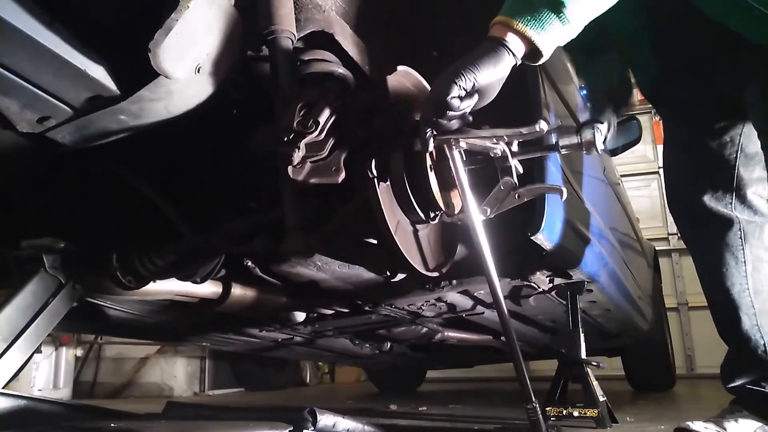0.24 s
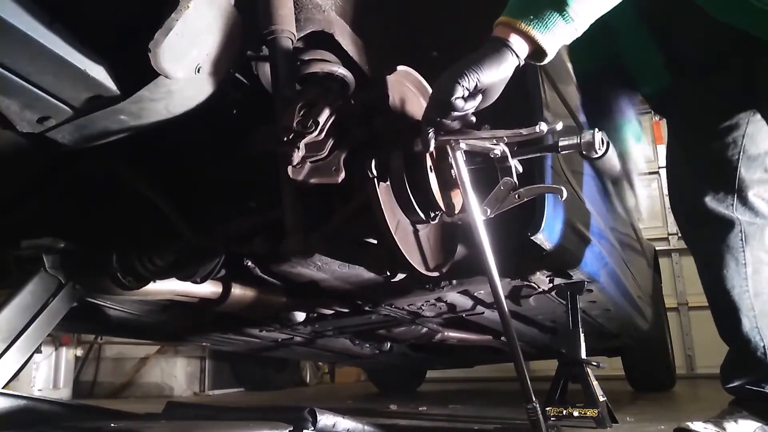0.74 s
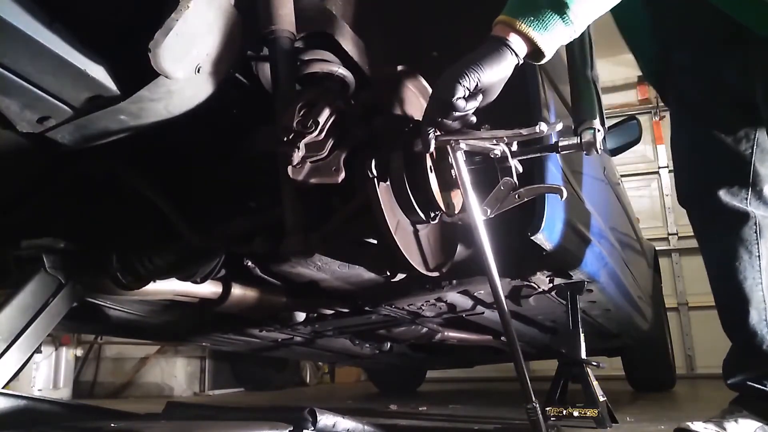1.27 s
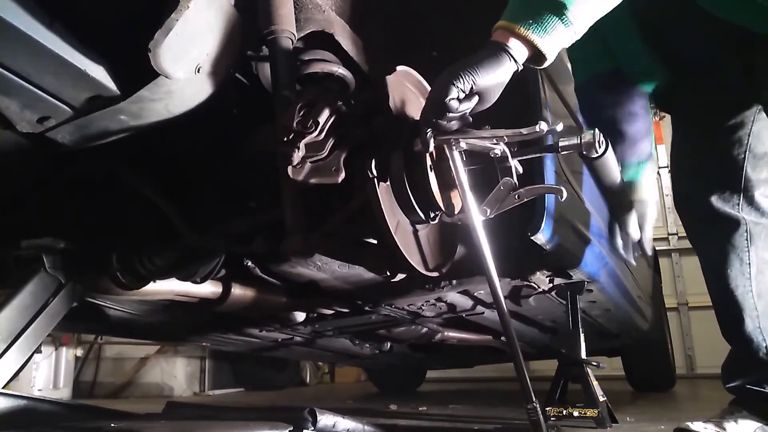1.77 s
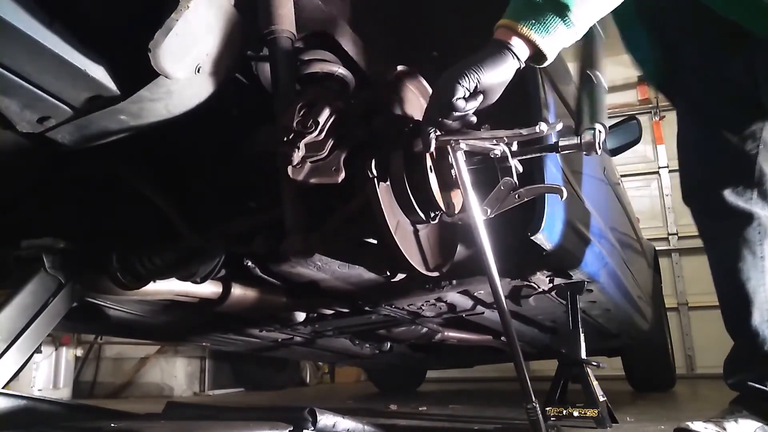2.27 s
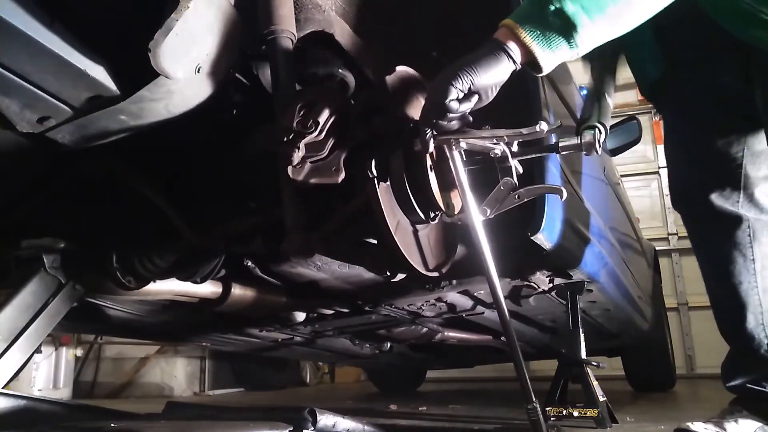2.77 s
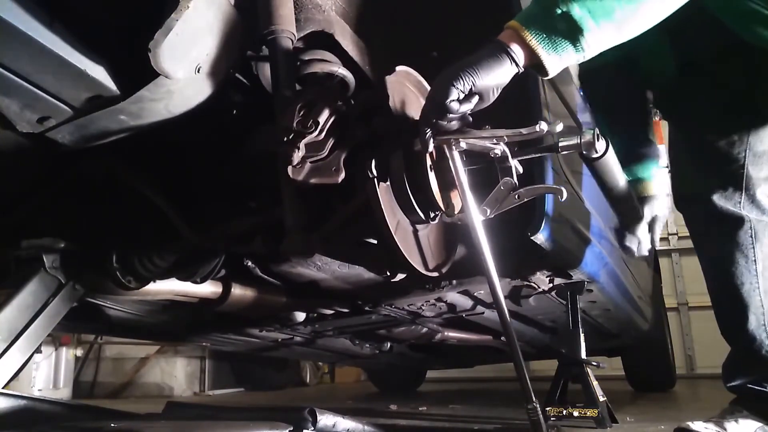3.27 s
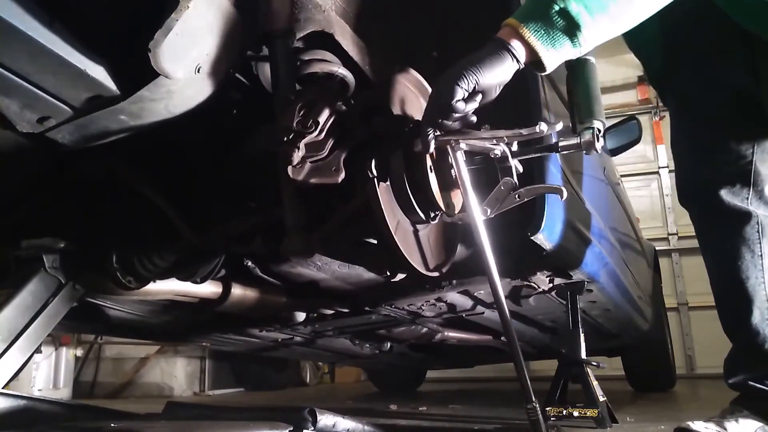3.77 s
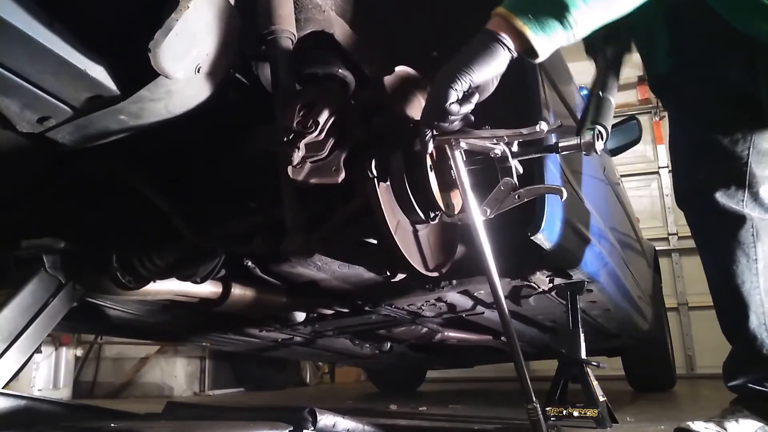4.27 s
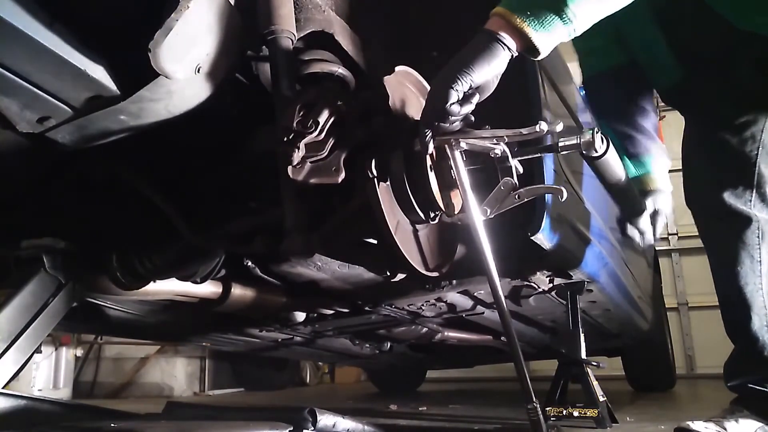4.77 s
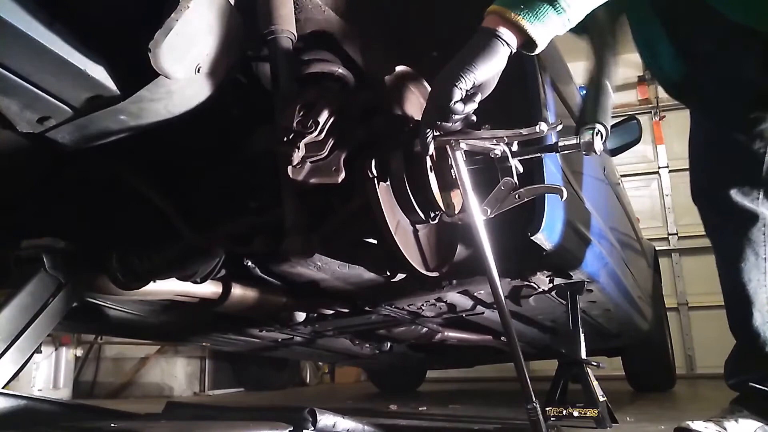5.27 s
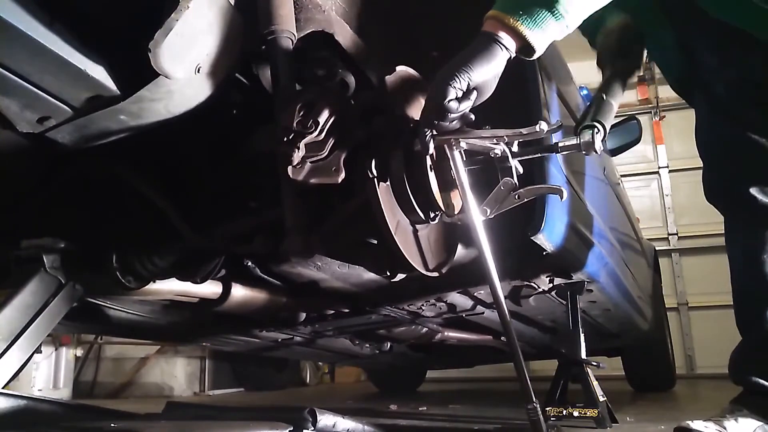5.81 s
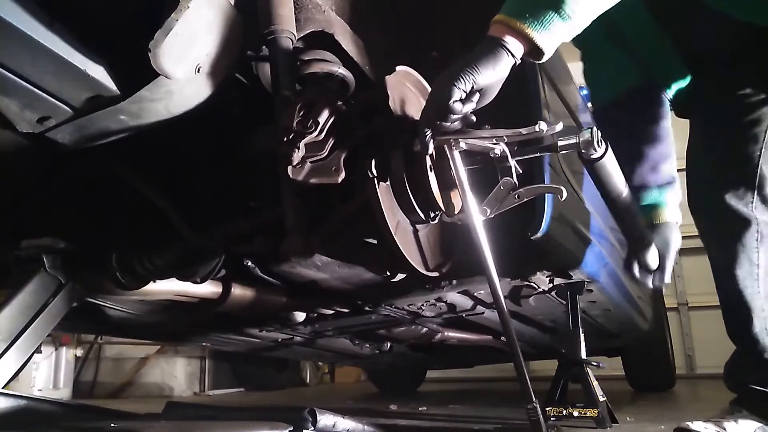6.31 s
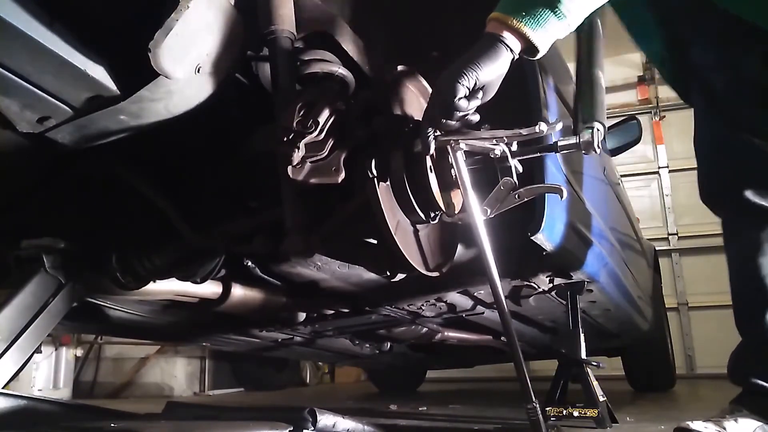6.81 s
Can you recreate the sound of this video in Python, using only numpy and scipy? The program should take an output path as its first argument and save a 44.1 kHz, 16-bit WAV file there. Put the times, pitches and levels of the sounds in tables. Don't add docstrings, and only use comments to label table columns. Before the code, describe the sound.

A steel puller works on a car hub: a hard bang, then clanking, knocking and ticking cycles, then a second equally hard bang.

```python
import sys
import numpy as np
from scipy import signal
from scipy.fft import rfft, irfft, next_fast_len
from scipy.io import wavfile
from scipy.ndimage import uniform_filter1d

SR = 44100
rng = np.random.default_rng(int(sys.argv[2]) if len(sys.argv) > 2 else 0)


def materialize(psi):
    bounded = np.clip(np.atleast_2d(psi).T, -1, 1)
    quanta = np.round(bounded * 32767).astype(np.int16)
    wavfile.write(sys.argv[1], SR, quanta)


def level_to_linear(level):
    exponent = np.asarray(level, float) / 20
    return 10 ** exponent


N = 310905

SPAN = 16384
HZ = np.fft.rfftfreq(SPAN, 1 / SR) + 1

# (frequency [Hz], width [Hz], level [dB])
CAR_MODES = [(127.5, 5.3, -3), (155.3, 13, -1.5), (191, 9, -10.5), (219, 9, -6.5), (252.5, 18, -2.5),
             (340, 9, -2), (388, 12, -3), (417, 8.6, -3), (1516, 27, -3), (1557, 22, -2.5), (3800, 80, -9),
             (4530, 53, -3), (4714, 60, 1.5), (5750, 80, -4)]
# (frequency [Hz], width [Hz], level [dB])
SLACK_MODES = [(1470, 84, -20), (2053, 34, -8.5), (2540, 46, -11.5), (2880, 30, -14), (3680, 21, -8),
               (3742, 82, 1.5), (5000, 43, -15.5), (5640, 47, -8.5), (5800, 54, -6.5), (6400, 49, -9.5),
               (7100, 77, -17), (9050, 23, -16.5), (10600, 44, -18.5), (12600, 40, -22)]
# (frequency [Hz], width [Hz], level [dB])
LOAD_MODES = [(1158, 33, -3), (1480, 55, -3), (2060, 64, -6), (2980, 73, -7), (4430, 70, -6),
              (4850, 47, -3), (5330, 28, 1), (5430, 25, -3.5), (5800, 45, -5.5), (7500, 64, -14),
              (8170, 58, -7), (9650, 27, -11), (11400, 17, -13.5), (13510, 18, -14)]
# (frequency [Hz], width [Hz], level [dB])
LAST_LOAD_MODES = [(1460, 78, -12), (2130, 68, -6), (2610, 32, -15), (3780, 50, -14), (4400, 27, -1.5),
                   (4700, 35, -4.5), (5120, 45, 1.5), (5850, 34, 5.5), (6330, 100, -2), (8100, 36, -5.5),
                   (9750, 40, -9.5), (11400, 60, -21.5), (13350, 30, -18.5), (15200, 40, -25.5)]
# (frequency [Hz], level [dB])
SLACK_TONE = [(180, -41), (300, -21), (1730, -15.5), (2050, -8.5), (3220, -16), (3620, -13.5), (4200, -11),
              (5680, 1.5), (10800, -20.5), (13500, -31), (16300, -75.5)]
# (frequency [Hz], level [dB])
LOAD_TONE = [(180, -30), (300, -15), (800, -17.5), (1490, -10), (3400, -15), (5400, -7), (7000, -13.5),
             (9000, -28.5), (13500, -44.5), (16300, -54.5)]
# (frequency [Hz], t60 [s], left-right likeness [0-1], build-up [ms], echo level [dB])
GARAGE = [(30.4, 0.93, 0.4, 27, -3.5), (149, 0.61, 1, 13, 6), (283, 0.54, 1, 22, 2), (640, 0.57, 0, 2.9, 5),
          (1481, 0.51, 0.04, 3.5, 3.5), (4040, 0.49, 0.08, 0.8, 1), (8700, 0.28, 0.3, 0.65, -5),
          (15100, 0.094, 0.2, 3, -9)]


def at_hz(points, hz, axis=1):
    points = np.array(points)
    return np.interp(np.log(hz), np.log(points[:, 0]), points[:, axis])


def causal(level_db):
    cepstrum = irfft(level_db * np.log(10) / 20, SPAN)
    cepstrum[1:SPAN // 2] *= 2
    cepstrum[SPAN // 2 + 1:] = 0
    return np.exp(rfft(cepstrum))


def resonances(modes):
    hz, width, _ = np.transpose(modes)[:, :, None]
    width = np.clip(width, 4, 900)
    return 1j * width * HZ / (hz ** 2 - HZ ** 2 + 1j * width * HZ)


def add(track, s, sound):
    i = round(s * SR)
    track[:, i:i + SPAN] += sound[:, :N - i]


def contacts(rows, touch, tone, modes, ring_db, level_db, treble_db, tilt=0.17, pivot_hz=4000,
             swell=0.77, uneven_db=3.0, lag=3):
    out = np.zeros((2, N))
    t = np.arange(SPAN) / SR
    fade = np.minimum(1, 8 * (1 - np.arange(SPAN) / SPAN))
    shapes = resonances(modes)
    mode_db = np.array(modes)[:, 2]
    mode_energy = np.sum(abs(shapes) ** 2, axis=1)
    pan_db, length_ms, share = touch
    u = 1000 * t / max(length_ms, .3)
    touch_shape = u ** np.clip(swell, .3, 4) * np.exp(-2 * u)
    octaves = np.log2(np.clip(HZ / pivot_hz, .25, 4))
    crack_power = level_to_linear(at_hz(tone, HZ)) ** 2
    for s, peak_db, own_treble_db in rows:
        chatter = rfft(rng.standard_normal(SPAN) * touch_shape)
        power = abs(chatter) ** 2
        grip = np.sqrt(abs(shapes) ** 2 @ power / mode_energy / power.mean())
        uneven = uneven_db * rng.standard_normal(len(modes))
        strength = share * level_to_linear(mode_db + ring_db + uneven) / grip
        ring_power = strength ** 2 @ abs(shapes) ** 2
        body_db = 10 * np.log10(crack_power + ring_power)
        hardness_db = tilt * (own_treble_db - treble_db) * octaves
        sound = irfft(chatter * causal(hardness_db + body_db), SPAN) * fade
        peak = np.sqrt(uniform_filter1d(sound ** 2, size=176).max())
        sound *= level_to_linear(peak_db + level_db) / peak
        ports = np.stack([sound, np.roll(sound, lag)])
        add(out, s, ports * level_to_linear(np.array([[pan_db / 2], [-pan_db / 2]])))
    return out


def part_lets_go():
    # (time [s], peak level [dB], treble against peak [dB])
    releases = [
        (.338, 3, -11),
        (6.086, 3, -10),
    ]
    # (frequency [Hz], level [dB])
    bang_tone = [(24, -54), (40, -18), (96, -28.5), (140, -13.5), (404, -9), (720, -17), (1530, -14.5),
                 (2660, -16), (4700, -9), (6000, -9), (7600, -14), (14500, -17.5), (15600, -45)]
    grind_lag_s, grind_db = .003, -11.5
    grinds = [(s + grind_lag_s, db + grind_db, treble_db) for s, db, treble_db in releases]
    crack = contacts(releases, (-1.4, 6, 0.14), bang_tone, CAR_MODES,
                     ring_db=1.5, level_db=-0.5, treble_db=-5.5, tilt=0.51, swell=0.23)
    grind = contacts(grinds, (5.1, 59.2, 0.92), bang_tone, CAR_MODES,
                     ring_db=-1.0, level_db=-3, treble_db=-10, tilt=0.41)
    return crack + grind


def handle_takes_load():
    # (time [s], peak level [dB], treble against peak [dB])
    full = [
        (1.4317, -12.5, -1.5),
        (1.4528, -26, -36),
        (4.0933, -6, 3),
        (4.1129, -22.5, -30),
    ]
    light = [
        (2.6476, -13, -9.5),
        (2.827, -25.5, -12.5),
    ]
    last = [
        (5.699, -7.5, -7.5),
    ]
    # (frequency [Hz], width [Hz], level [dB])
    light_modes = [(1190, 30, -4.5), (1743, 40, -5), (2040, 36, -1.5), (3930, 45, -1), (4420, 60, -3.5),
                   (5700, 46, 1), (6200, 40, -4), (8100, 40, 0), (9800, 37, -12), (11000, 25, -21),
                   (11600, 30, -16), (13320, 18, -13)]
    touch = (2.4, 5.36, 0.52)
    clank = contacts(full, touch, LOAD_TONE, LOAD_MODES,
                     ring_db=5.0, level_db=-4.5, treble_db=-10.5, tilt=0.28, swell=1.44)
    light_clank = contacts(light, touch, LOAD_TONE, light_modes,
                           ring_db=1, level_db=-4.0, treble_db=-17, tilt=0.18, swell=1.45)
    bite = contacts(last, (2, 3.6, 0.49), LOAD_TONE, LAST_LOAD_MODES,
                    ring_db=5.5, level_db=-3.5, treble_db=-11.5, tilt=0.22, swell=1.7)
    return clank + light_clank + bite


def handle_drops_slack():
    # (time [s], peak level [dB], treble against peak [dB])
    knocks = [
        (1.9555, -6, -19.5),
        (3.3555, -6, -21),
        (4.9035, -6, -19.5),
    ]
    taps = [
        (1.9275, -12.5, -1),
        (1.9954, -16.5, -14.5),
        (3.3273, -18, -5.5),
        (4.9399, -14, -20.5),
    ]
    knock = contacts(knocks, (0.99, 4.6, 0.99), SLACK_TONE, SLACK_MODES,
                     ring_db=8, level_db=0.0, treble_db=-18, tilt=0.36, swell=2.63)
    tap = contacts(taps, (5.3, 3.1, 0.38), SLACK_TONE, SLACK_MODES,
                   ring_db=-4.0, level_db=-4.5, treble_db=-27.0)
    return knock + tap


def handle_recoils():
    # (time [s], peak level [dB], treble against peak [dB])
    rebounds = [
        (.7188, -19.5, 2),
        (.741, -20.5, 8),
        (6.49, -24, -1),
    ]
    snaps = [
        (6.4625, -7, -8),
    ]
    # (frequency [Hz], level [dB])
    recoil_tone = [(880, -53), (1500, -17), (1720, -34), (2210, -7), (3470, -24), (5710, 8.5),
                   (12700, -21.5), (14400, -38), (16300, -105)]
    rebound = contacts(rebounds, (17, 14, 0.17), recoil_tone, SLACK_MODES,
                       ring_db=9.0, level_db=-5.5, treble_db=-22)
    snap = contacts(snaps, (2.7, 4, 0.5), recoil_tone, SLACK_MODES,
                    ring_db=5.5, level_db=-3.0, treble_db=-15.5, swell=2.1)
    return rebound + snap


def handle_drags():
    # (time [s], peak level [dB], treble against peak [dB])
    drags = [
        (5.612, -30, -39.5),
        (5.648, -30, -32.5),
        (5.672, -26.5, -39.5),
        (.664, -21.5, -29),
        (6.412, -21, -17),
        (2.62, -25.5, -28.5),
    ]
    return contacts(drags, (1.4, 32, .4), SLACK_TONE, LAST_LOAD_MODES[:10],
                    ring_db=11.5, level_db=-3.0, treble_db=-24, swell=0.78)


def pawl_ticks():
    # (time [s], peak level [dB], treble against peak [dB])
    ticks = [(.8383, -35, -11), (.8885, -38.5, -16), (.9404, -37, -16), (.9939, -33, -12.5),
             (1.0466, -27.5, -6), (1.1165, -25, -1), (2.1065, -16, -15.5), (2.155, -13.5, -12.5),
             (2.2093, -17, -13.5), (2.2541, -14.5, -4.5), (2.3105, -18.5, -10), (2.389, -16, -5.5),
             (3.5044, -15, -14), (3.552, -15, -14.5), (3.5997, -16.5, -13.5), (3.6415, -17, -17),
             (3.682, -17.5, -14.5), (3.7404, -18, -14), (5.135, -17.5, -15.5), (5.2003, -15.5, -15.5),
             (5.2627, -16, -12.5), (5.3269, -16, -5), (5.3908, -15, -7.5)]
    free_ticks = [
        (6.5847, -29, 0),
        (6.6408, -33, -5.5),
        (6.6872, -33.5, -9),
        (6.7396, -31.5, 5),
        (6.7999, -35.5, -9),
        (6.8478, -43.5, -10),
        (6.9089, -41, -8),
    ]
    # (frequency [Hz], level [dB])
    pawl_tone = [(800, -33), (2000, -14.5), (4000, -13.5), (6500, -1.5), (8300, -14.5), (9600, -29),
                 (11300, -20), (13000, -26.5), (15300, -22.5), (16400, -26)]
    # (frequency [Hz], width [Hz], level [dB])
    pawl_modes = [(2160, 150, -16.5), (3820, 140, -15), (5730, 200, -13.5), (7260, 150, -11.5),
                  (9510, 154, 3.5), (9550, 59, -6), (10000, 85, -7), (11060, 81, -22), (11260, 100, -6),
                  (14700, 90, 0), (15420, 70, -2.5), (15700, 70, -4.5)]
    free_modes = [(3860, 170, -18), (6300, 190, -21), (9460, 170, -8), (11070, 200, -8.5),
                  (12940, 310, -10), (14500, 81, -7), (15060, 89, 12), (15500, 90, -4)]
    touch = (13.36, 4.56, 0.85)
    tick = contacts(ticks, touch, pawl_tone, pawl_modes, ring_db=6, level_db=-8.0, treble_db=-10.0,
                    tilt=0.62, pivot_hz=9600, swell=0.55, uneven_db=4.5, lag=2)
    free_tick = contacts(free_ticks, touch, pawl_tone, free_modes, ring_db=6.5, level_db=-2.0, treble_db=-7,
                         tilt=0.46, pivot_hz=9700, uneven_db=9.0, lag=2)
    return tick + free_tick


def puller_shifts():
    # (time [s], peak level [dB], treble against peak [dB])
    shifts = [
        (.0425, -53, -1),
        (1.5785, -30.5, -11),
        (1.8354, -66, -5),
        (3.2384, -54.5, -24),
        (3.9742, -50, -25),
        (4.4887, -35.5, -13),
        (4.8644, -46.5, -14),
    ]
    return contacts(shifts, (-7.5, 29, 0.32), LOAD_TONE, LOAD_MODES[:9],
                    ring_db=1, level_db=-5, treble_db=-18, tilt=.25)


def car_thuds():
    # (time [s], peak level [dB], treble against peak [dB])
    thuds = [(1.583, -29, -11.5), (1.956, -24, -16.5), (2.699, -38.5, -4), (2.829, -25.5, 12),
             (2.873, -41.5, -27), (3.228, -42.5, -19.5), (3.368, -22, -10), (4.111, -34, -6),
             (4.492, -25.5, 1.5), (4.533, -47.5, -31.5), (4.921, -25.5, -42), (5.616, -39.5, -31.5),
             (5.711, -26, -14.5)]
    # (frequency [Hz], level [dB])
    thud_tone = [(24, -30), (40, -23.5), (140, 2), (209, 2.5), (357, 1), (570, -11.5), (700, -21.5),
                 (900, -34.5), (1170, -52.5), (1980, -120)]
    return contacts(thuds, (-2.2, 45, 1), thud_tone, CAR_MODES[:8],
                    ring_db=0.0, level_db=-4.5, treble_db=-4.5, tilt=0.2, pivot_hz=248)


def bumps(rows, swell_ms, t60, level_db, pitch_spread):
    out = np.zeros((2, N))
    t = np.arange(SPAN) / SR
    swell = 1 - np.exp(-1000 * t / max(swell_ms, 1))
    decay = level_to_linear(-60 * t / max(t60, .02))
    shape = swell * decay * (1 - t / t[-1])
    for s, peak_db, hz in rows:
        detune, phase = rng.standard_normal((2, 3, 1))
        pitch = hz * (1 + pitch_spread * detune * [[0], [1], [1]])
        partials = np.array([[1], [.6], [.6]]) * np.sin(2 * np.pi * pitch * t + 2 * phase)
        sound = level_to_linear(peak_db + level_db) * partials.sum(axis=0) * shape / shape.max()
        add(out, s, np.tile(sound, (2, 1)))
    return out


def soft_bumps():
    # (time [s], peak level [dB], pitch [Hz])
    knocks = [(.075, -48.5, 453), (.127, -58, 423), (.227, -41.5, 314), (.297, -51, 300),
              (1.338, -41.5, 273), (1.449, -34, 257), (1.829, -65, 277), (2.396, -49.5, 516),
              (2.469, -46.5, 489), (2.59, -43, 168), (2.975, -53, 497), (3.105, -62, 1226),
              (1.19, -58, 880), (3.136, -55.5, 448), (3.777, -40.5, 266), (3.95, -49, 209),
              (4.743, -47.5, 450), (4.801, -42, 264), (5.211, -45, 417), (5.933, -47, 282),
              (6.861, -50, 488)]
    return bumps(knocks, swell_ms=10, t60=0.21, level_db=-8.5, pitch_spread=0.089)


def panel_hums():
    # (time [s], peak level [dB], pitch [Hz])
    hums = [
        (.7, -40.5, 385),
        (1.0, -54, 385),
        (6.45, -43.5, 391.7),
        (6.75, -56, 390),
    ]
    return bumps(hums, swell_ms=23, t60=1, level_db=-8.5, pitch_spread=0.0141)


def stereo_noise(count, level_db):
    hz = np.fft.rfftfreq(count, 1 / SR) + 1
    alike = np.clip(at_hz(GARAGE, hz, axis=2), 0, 1)
    mid, side = rfft(rng.standard_normal((2, count))) * level_to_linear(level_db(hz))
    mid = np.sqrt(1 + alike) * mid
    side = np.sqrt(1 - alike) * side
    return irfft([mid + side, mid - side], count)


def garage_echo():
    t = np.arange(SR) / SR
    out = 0
    for centre in 25 * 2 ** np.arange(0, 9.6, .5):
        band = stereo_noise(SR, lambda hz: -6 * (4 * np.log2(hz / centre)) ** 2 / 2)
        build_up = 1 - np.exp(-1000 * t / max(at_hz(GARAGE, centre, axis=3), .5))
        shape = build_up * level_to_linear(-60 * t / at_hz(GARAGE, centre))
        level = level_to_linear(at_hz(GARAGE, centre, axis=4))
        out = out + level * band * shape / np.sqrt(np.sum(shape ** 2))
    return out


def rms_one(x):
    return x / np.sqrt(np.mean(x ** 2) + 1e-20)


def flicker(rate, depth_db):
    steps = rng.standard_normal(400)
    return level_to_linear(depth_db * np.interp(np.arange(N) / SR * rate, np.arange(400), steps))


def sleeves_and_hush():
    # (time [s], level [dB])
    loudness = [(0, -58), (.1, -68), (1.35, -63.5), (1.78, -71.5), (1.9, -59.5), (2.6, -63), (3.1, -85),
                (3.2, -65), (3.9, -59), (4.4, -69), (5.95, -54), (6.08, -69), (6.95, -61), (7.05, -72.5)]
    # (frequency [Hz], level [dB])
    rustle_tone = [(59, -44.5), (100, -7.5), (270, 1), (353, -13.5), (452, -8.5), (791, -17), (4220, -18),
                   (4780, -16.5), (12400, -45.5), (14000, -58.5)]
    noise = stereo_noise(next_fast_len(N), lambda hz: at_hz(rustle_tone, hz))
    level_db = np.interp(np.arange(N) / SR, *np.transpose(loudness))
    return rms_one(noise)[:, :N] * flicker(22, depth_db=1.5) * level_to_linear(level_db)


def shaking():
    # (time [s], level [dB], held [s])
    jolts = [(.34, -35.5, .08), (1.409, -43, 0.19), (1.95, -37.5, 0.14), (2.6, -44.5, 0.25),
             (3.37, -32.5, 0.17), (4.09, -39.5, 0.043), (4.499, -45, 0.038), (4.9, -39.5, 0.21),
             (5.68, -33.5, 0.068), (6.09, -48, .1), (6.3, -42.5, 0.44)]
    rise_db_per_s, fall_db_per_s, still_db = 397.5, 133.5, -68.5
    t = np.arange(N) / SR
    s, db, held = np.transpose(jolts)[:, :, None]
    top = s + .04
    rise_db = rise_db_per_s * np.maximum(top - t, 0)
    fall_db = fall_db_per_s * np.maximum(t - top - held, 0)
    level_db = db - rise_db - fall_db
    return level_to_linear(np.maximum(level_db.max(axis=0), still_db) - 9.0)


def car_rumbles():
    # (frequency [Hz], level [dB])
    rumble_tone = [(12, -36.5), (20, -17.5), (48, -5.5), (64, 0), (86, -8.5), (110, -12), (140, -21.5),
                   (240, -120)]
    noise = stereo_noise(next_fast_len(N), lambda hz: at_hz(rumble_tone, hz) - 40 * (hz > 120))
    return rms_one(noise)[:, :N] * shaking()


def scene():
    bang = part_lets_go()
    load = handle_takes_load() + puller_shifts()
    slack = handle_drops_slack()
    recoil = handle_recoils() + handle_drags()
    pawl = pawl_ticks()
    thud = car_thuds()
    soft = soft_bumps() + panel_hums()
    sent = level_to_linear(5.5) * bang + level_to_linear(-7.0) * load + level_to_linear(-3.5) * slack + level_to_linear(-9.5) * recoil
    sent = sent + level_to_linear(-7.5) * pawl + level_to_linear(-17.0) * thud + level_to_linear(-5) * soft
    wet = signal.fftconvolve(sent[:1], garage_echo(), axes=1)[:, :N]
    wet = wet * level_to_linear(np.array([[-1.2], [1.2]]))
    direct = bang + load + slack + recoil + pawl + thud + soft
    return direct + wet + sleeves_and_hush() + car_rumbles()


def band_limit(x):
    return signal.sosfilt(signal.butter(12, 16420, fs=SR, output="sos"), x)


def record(dry):
    ceiling_db, release_db_per_s = -8, 59.5
    power = uniform_filter1d(np.mean(dry ** 2, axis=0), size=400)
    level_db = 10 * np.log10(power + 1e-12)
    ramp = release_db_per_s * np.arange(N) / SR
    over_db = np.maximum.accumulate(np.maximum(level_db - ceiling_db, 0) + ramp) - ramp
    limited = dry * level_to_linear(-uniform_filter1d(over_db, size=300, origin=-100))
    top_cut = signal.cheby2(10, 50, 16500, fs=SR, output="sos")
    cut = signal.sosfilt(top_cut, limited)
    return band_limit(np.clip(cut, -1, 1))


dry = scene()
out = record(dry)
materialize(out)
```